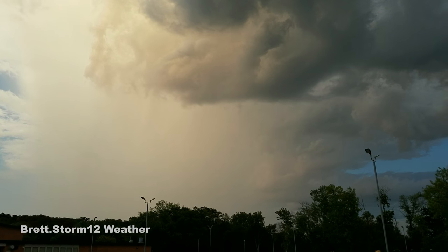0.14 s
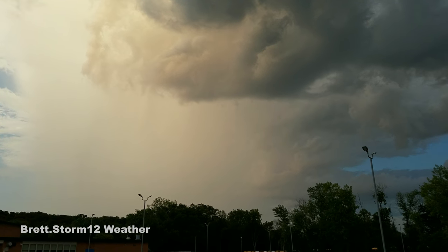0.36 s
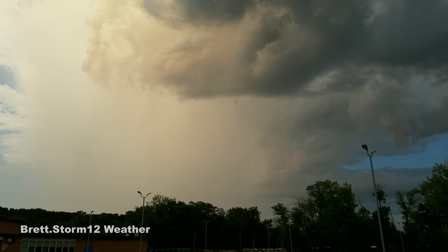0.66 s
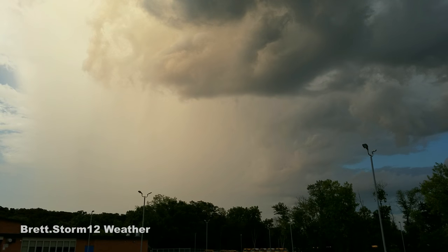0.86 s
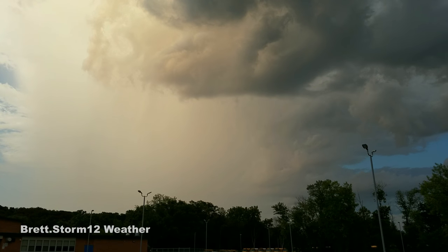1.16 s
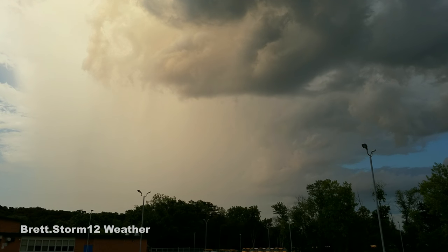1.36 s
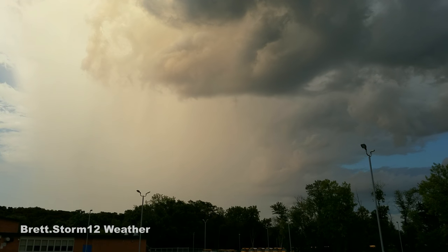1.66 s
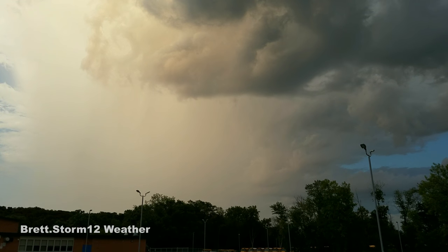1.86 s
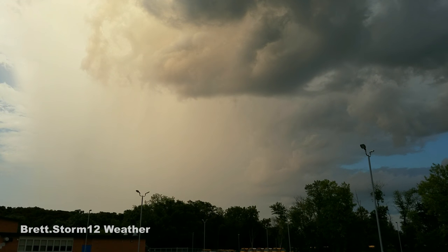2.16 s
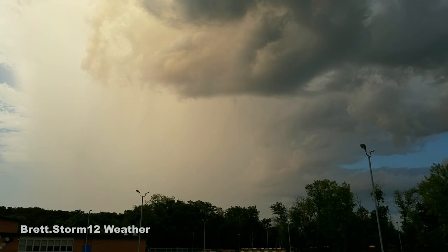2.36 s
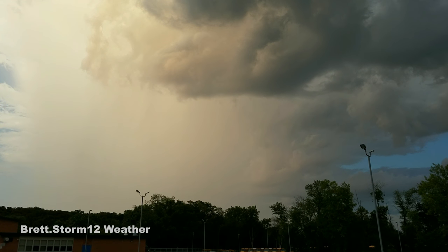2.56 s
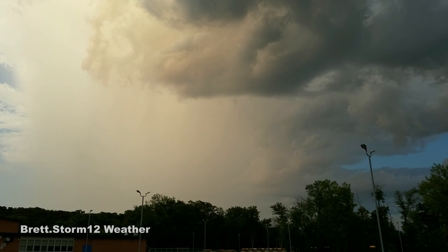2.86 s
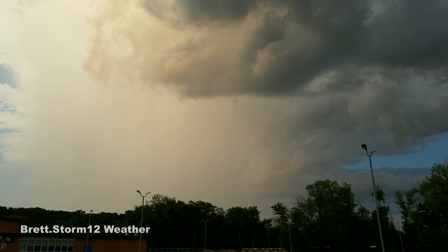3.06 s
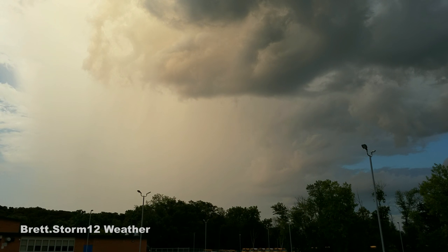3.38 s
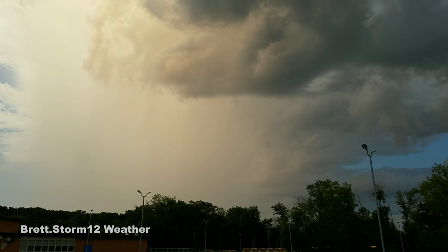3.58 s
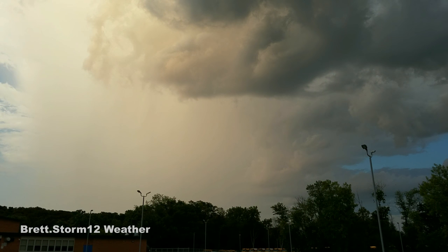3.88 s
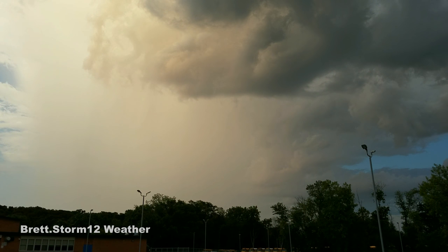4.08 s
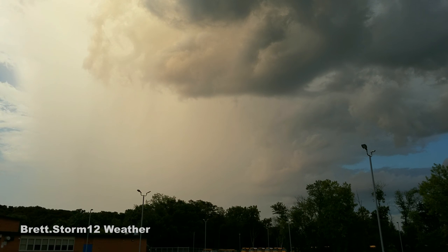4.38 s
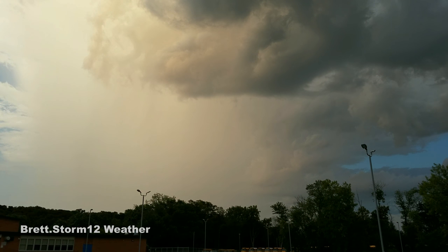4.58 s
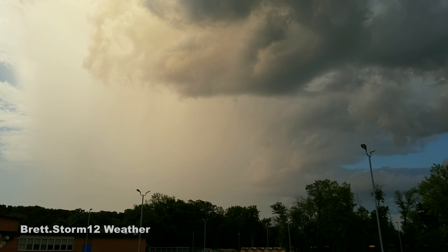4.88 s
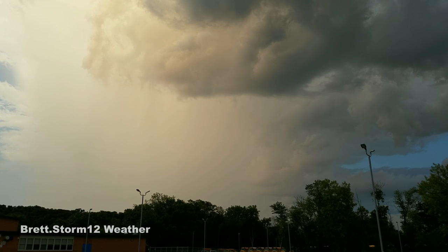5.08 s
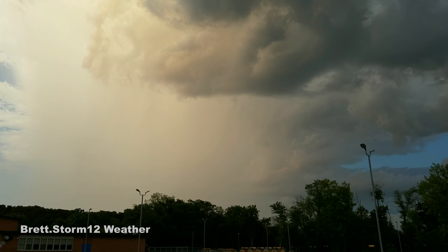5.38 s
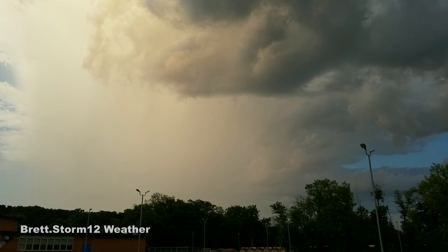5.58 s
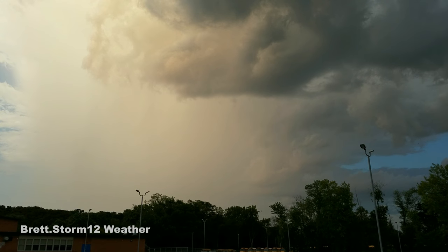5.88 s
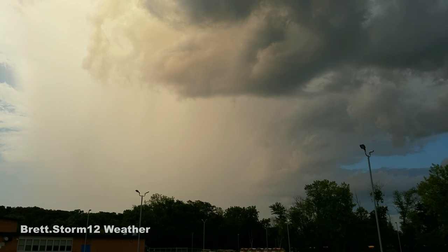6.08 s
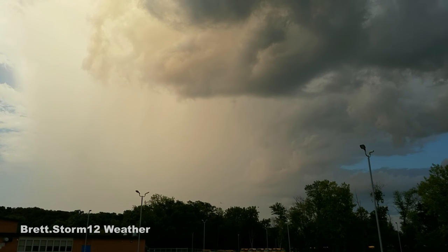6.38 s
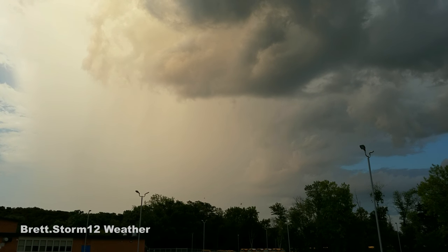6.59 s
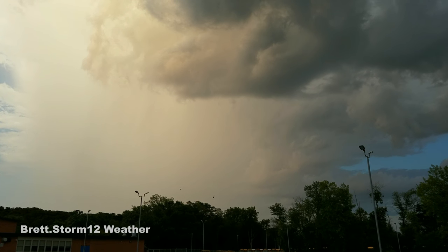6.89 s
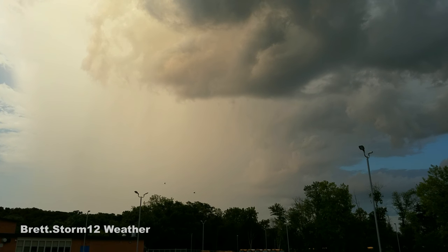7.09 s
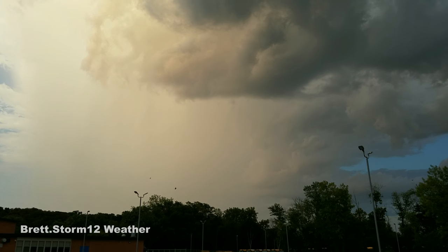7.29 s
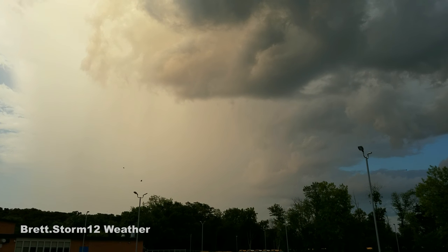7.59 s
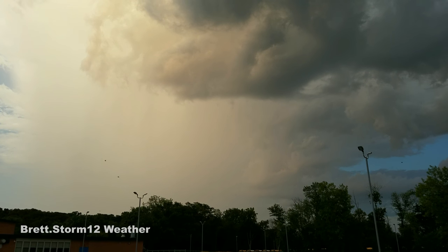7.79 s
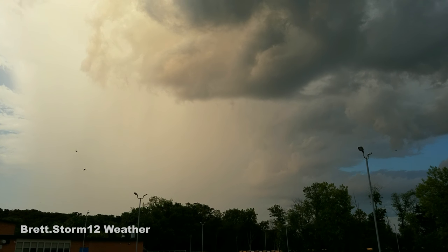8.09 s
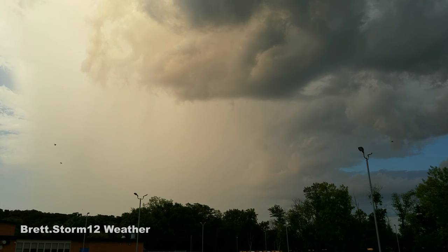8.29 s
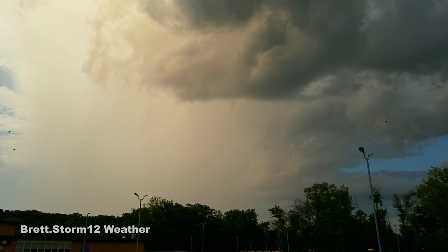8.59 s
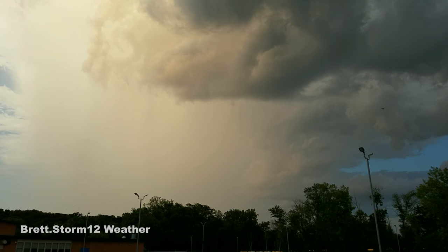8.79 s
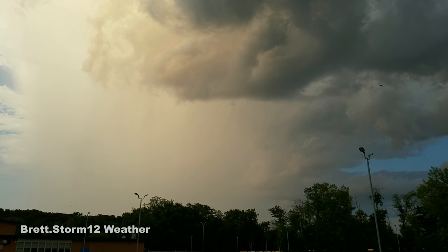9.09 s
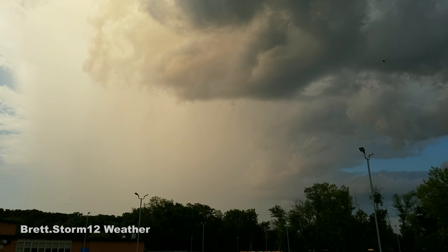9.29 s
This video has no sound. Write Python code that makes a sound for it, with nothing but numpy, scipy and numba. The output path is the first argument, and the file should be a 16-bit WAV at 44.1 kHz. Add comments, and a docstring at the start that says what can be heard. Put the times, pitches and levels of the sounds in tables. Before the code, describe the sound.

Outdoors under a storm cloud, a brief rough crackle leads into a violent thunder crack within the first half second. Clustered claps and tearing snaps follow for about two seconds, then heavy low booms roll unevenly, surging again past the middle and near the end. Faint bird chirps and slight hiss sit beneath. Stereo camera microphone, thunder a little louder on the right, loudest peaks rounded.

```python
"""Thunder over open ground

Every kink of the lightning channel sends a pressure pulse to a camera with two spaced microphones. The roll is
five swarms of random band-passed pulses, duller as the sound comes from further off. Booms and claps are
decaying sines, surges arched ones, cracks noise ticks with a rough pitched tearing. Around them: a deep noise
shudder, sine chirps of birds, a faint noise twitter and camera hiss; the loudest peaks are rounded."""
import sys
import numpy as np
from scipy import signal
from scipy.fft import rfft, irfft
from scipy.io import wavfile
from scipy.ndimage import uniform_filter1d
from numba import njit

SR = 44100
rng = np.random.default_rng(int(sys.argv[2]) if len(sys.argv) > 2 else 0)


def persist_wave(psi):
    """Save psi, clipped to +-1, as 16-bit WAV."""
    counts = np.round(np.clip(psi, -1, 1) * 32767).astype(np.int16)
    wavfile.write(sys.argv[1], SR, np.atleast_2d(counts).T)


def volts_from_decibels(level):
    """Turn decibel levels (scalar or array-like) into linear amplitude factors."""
    exponent = np.asarray(level, float) / 20
    return 10 ** exponent


N = 416744
T = np.arange(N) / SR
MAIN_S = 0.32  # cracks before and after this instant differ in shape

# Course of the roll. Each row: time in seconds, level of the long pulses in dB, of the middle pulses in dB.
ROLL_LEVELS = [(0.0, -46, -35), (0.26, -47, -24), (0.318, -40, -25), (0.35, -18, -17.5), (0.41, -34, -19.5),
               (0.45, -22.5, -18), (0.5, -33, -18), (0.54, -32, -22), (0.578, -38, -23.5),
               (0.625, -39, -24), (0.75, -31.5, -23.5), (0.92, -41, -30.5), (1.03, -34.5, -24.5),
               (1.08, -41, -23.5), (1.13, -39, -21.5), (1.241, -47, -30), (1.32, -30, -25),
               (1.6, -26.5, -26), (1.89, -26, -26.5), (2.26, -27.5, -29.5), (2.581, -28, -35.5),
               (2.64, -20, -25.5), (2.74, -21.5, -24.5), (2.81, -18.5, -27), (2.88, -23, -33.5),
               (3.42, -23.5, -30.5), (3.629, -21.5, -25), (4.33, -24, -28.5), (4.5, -24.5, -29.5),
               (5.3, -23.5, -30), (5.5, -24, -31.5), (5.735, -23.5, -29.5), (5.761, -16.5, -18),
               (5.95, -18.5, -22), (6.2, -24, -26.5), (6.7, -20, -24.5), (6.8, -24, -30),
               (7.55, -23.5, -26), (7.62, -24, -20), (7.7, -24, -29), (8.0, -24.5, -28.5), (8.55, -28, -36),
               (8.7, -24.5, -33), (9.08, -28, -35.5), (9.45, -27, -35)]
# Bursts of middle pulses. Each row: start in seconds, level in dB, pitch in Hz, level of the short pulses in dB.
CLAP_EVENTS = [(0.018, -19.5, 605, -33), (0.024, -19, 333, -18.5), (0.083, -18, 400, -20.5),
               (0.093, -21, 517, -16.5), (0.148, -16, 420, -36), (0.18, -20, 464, -36),
               (0.209, -14.5, 565, -30), (0.225, -21, 380, -37), (0.271, -12, 384, -23),
               (0.306, -18, 450, -18), (0.327, -6, 329, -10), (0.352, -2.5, 442, -47),
               (0.429, -5.5, 433, -26), (0.45, -4, 490, -17.5), (0.531, -7.5, 344, -19.5),
               (0.545, -1.5, 355, -28), (0.604, -7.5, 330, -22), (0.68, -14, 330, -27),
               (0.709, -12, 297, -24), (0.767, -8, 280, -23.5), (0.865, -16, 750, -27),
               (0.916, -12, 490, -23), (0.953, -14, 510, -21), (0.998, -10.5, 450, -25.5),
               (1.124, -8.5, 405, -51), (1.263, -14, 404, -30), (1.3, -6, 421, -22.5),
               (1.369, -10.5, 417, -52), (1.472, -14, 327, -23), (1.558, -8.5, 470, -23),
               (1.606, -16, 303, -37), (1.669, -9, 260, -21), (1.877, -13, 313, -26),
               (1.904, -6.5, 330, -22), (1.942, -9, 318, -28.5), (1.976, -6, 323, -26),
               (2.046, -16, 554, -27), (2.15, -26, 450, -30), (2.302, -13.5, 508, -18.5),
               (2.365, -13.5, 510, -35), (2.616, -10.5, 280, -37), (2.676, -12.5, 283, -26),
               (2.768, -12, 513, -26), (3.033, -19, 664, -32), (2.95, -21.5, 500, -32),
               (3.17, -24, 495, -29.5), (3.2, -21, 506, -28.5), (1.853, -24, 496, -34.5),
               (3.435, -19, 514, -30.5), (3.486, -12, 456, -28.5), (3.721, -8.5, 333, -35),
               (3.802, -16, 478, -25), (3.829, -14, 287, -48), (4.028, -27, 500, -34.5),
               (4.073, -11, 496, -34), (4.091, -20, 306, -26.5), (4.279, -15, 485, -25.5),
               (4.323, -15, 683, -26), (5.335, -16.5, 500, -32), (5.455, -20, 300, -49),
               (5.751, -10.5, 592, -48), (5.764, -9.5, 614, -45), (5.778, -9, 500, -42),
               (5.802, -4, 370, -40), (5.814, -16, 745, -40), (5.85, -15.5, 444, -44),
               (5.903, -9.5, 425, -39), (6.07, -14, 478, -40), (6.315, -9.5, 391, -48),
               (7.169, -12.5, 383, -45), (7.219, -13.5, 326, -60), (7.595, -9, 312, -45),
               (7.622, -13, 350, -48), (7.718, -16, 397, -33.5), (7.953, -16.5, 353, -45)]
# Steep shock fronts. Each row: start in seconds, relative tick level in dB, relative tearing level in dB,
# tearing pitch in Hz.
CRACK_EVENTS = [(0.027, -61, -39, 2050), (0.092, -66, -30, 2600), (0.201, -60.5, -25.5, 2990),
                (0.209, -65.5, -32, 2170), (0.219, -55, -34, 2840), (0.228, -62.5, -23.5, 2150),
                (0.27, -60, -22, 2450), (0.278, -62, -27.5, 3200), (0.288, -54.5, -24.5, 3000),
                (0.294, -65.5, -29, 2030), (0.327, -30, -19, 3300), (0.3413, -31, -8, 2150),
                (0.355, -41, -38, 2100), (0.369, -47, -40, 2280), (0.3894, -48.5, -17, 1900),
                (0.4236, -45, -25, 1950), (0.449, -35.5, -19, 1830), (0.5124, -47, -23, 2360),
                (0.527, -34.5, -18.5, 4540), (0.5485, -30, -16, 1895), (0.604, -29, -18, 1860),
                (0.633, -42, -20, 1720), (0.6606, -47, -33, 1930), (0.68, -44, -20, 1990),
                (0.7107, -47.5, -26, 1970), (0.767, -39, -25, 1930), (0.918, -44, -36, 1970),
                (0.955, -40.5, -46, 1880), (0.9992, -42, -18, 1930), (1.0657, -54, -17.5, 1840),
                (1.118, -46.5, -48, 1880), (1.3, -38, -22, 1980), (1.3299, -45.5, -17, 1900),
                (1.3447, -46.5, -25, 1790), (1.3833, -54, -47, 1770), (1.4371, -47, -19, 1970),
                (1.4504, -43, -18, 1900), (1.474, -44.5, -23, 1910), (1.513, -50, -20, 1810),
                (1.5575, -43.5, -21, 2180), (1.669, -46, -26, 2080), (1.698, -52, -31, 2380),
                (1.8788, -63, -45, 1750), (1.943, -57, -37, 2300), (1.975, -56.5, -21.5, 2400),
                (2.3032, -61.5, -36, 2180), (2.6428, -69.5, -22.5, 1720), (2.673, -62.5, -25.5, 1820),
                (2.7834, -65, -23.5, 1820), (3.033, -73, -25, 1850)]
# Pulse runs without a sharp front. Each row: start in seconds, peak in dB, pitch in Hz,
# level of the short pulses in dB, length in seconds.
SURGE_EVENTS = [(.408, -15, 700, -34, 0.02), (0.461, -8.5, 450, -43, 0.022), (0.513, -8.5, 403, -29, 0.025),
                (0.588, -10.5, 405, -38, .016), (0.613, -9.5, 630, -20.5, 0.032),
                (.643, -14, 440, -32, 0.015), (0.66, -15, 398, -27, 0.019), (1.03, -12.5, 487, -38, 0.076),
                (1.174, -23.5, 600, -24, 0.025), (1.322, -11.5, 410, -25.5, 0.034),
                (2.474, -17.5, 305, -33, 0.055), (3.501, -17.5, 497, -40.5, 0.027),
                (3.553, -27, 451.5, -29.5, .11), (5.519, -20, 489, -43, .045)]


@njit
def svf(x, hz, damp, low):
    """State-variable filter with a moving centre: low-pass, or band-pass of gain 1."""
    y, band_state, low_state = np.empty(len(x)), 0., 0.
    for i in range(len(x)):
        g = np.tan(np.pi * hz[i] / SR)
        v = (band_state + g * (x[i] - low_state)) / (1 + g * (g + damp))
        lo = low_state + g * v
        band_state, low_state = 2 * v - band_state, 2 * lo - low_state
        y[i] = lo if low else damp * v
    return y


def band(x, hz, width_hz):
    """Fixed band-pass on both channels."""
    centre_hz = np.full(N, 1. * hz)
    return np.array([svf(c + 1e-18, centre_hz, width_hz / hz, False) for c in x])


def unit(x):
    """Scale to rms 1."""
    return x / np.sqrt(np.mean(x ** 2))


def walk(rate_hz):
    """Random levels held 1 / rate_hz and slewed twice; spread near 1."""
    k = int(SR / rate_hz)
    steps = np.repeat(rng.standard_normal(N // k + 1), k)
    return 1.36 * uniform_filter1d(uniform_filter1d(steps, k), k)[:N]


def add(out, s, wave):
    """Mix a short sound in at time s."""
    i = max(int(s * SR), 0)
    out[..., i:i + wave.shape[-1]] += wave[..., :N - i]


def swell(t, rise_s, t60_s):
    """Quick rise, exponential fall, peak 1."""
    e = (1 - np.exp(-t / rise_s)) ** 2 * np.exp(-np.log(1000) * t / t60_s)
    return e / e.max()


def arch(length_s):
    """Half-sine rise and fall."""
    return np.sin(np.pi * T[:int(length_s * SR)] / length_s)


def late(s):
    """Left-microphone lag in seconds; the sounding part of the channel moves across the sky."""
    # Each row: time in seconds, lag of the left microphone in ms.
    bearing = [(0, 0.4), (.4, 0.22), (1.4, 0.2), (3.6, -0.081), (5.5, -0.16), (5.75, 0.094), (7.8, 0.085),
               (8.7, -.14), (9.45, -0.15)]
    return np.interp(s, *np.transpose(bearing)) / 1000


def mic_times(t, s):
    """Clock of an arrival at the left and right microphones, the lag shared between them."""
    return t - late(s) * np.array([[.5], [-.5]])


def hiss():
    """Camera noise, unrelated in the two channels; it sinks just after the first strong cracks, slowly creeps back."""
    # Each row: frequency in Hz, relative spectral level in dB.
    spectrum = [(1700, -23.5), (2600, 10), (3300, 3.5), (3600, 1.5), (3950, 2.5), (4500, 0), (7590, -15.5),
                (11100, -12), (14400, -6), (15200, -3), (16000, -13.5)]
    hz, db = np.transpose(spectrum)
    f_hz = np.arange(N // 2 + 1) * SR / N + 1
    shape = volts_from_decibels(np.interp(np.log(f_hz), np.log(hz), db))
    noise = irfft(rfft(rng.standard_normal((2, N))) * shape, N)
    level_db, sink_db = -63, -10.5
    sunk = np.interp(T, (.55, 1.05, 1.6, 4.7), (0, 1, 1, 0))
    return unit(noise) * volts_from_decibels(level_db + sink_db * sunk)


def deep():
    """A wavering noise shudder at the bottom of hearing, partly wind on each microphone."""
    # Each row: time in seconds, level in dB.
    course = [(0, -49.5), (1.2, -52), (1.8, -48), (2.3, -50.5), (3.7, -44), (5.0, -45), (5.8, -41.5),
              (7.5, -45), (9.45, -43.5)]
    x = rng.standard_normal(N) + 0.31 * rng.standard_normal((2, N))
    level_db = np.interp(T, *np.transpose(course)) + 1.9 * walk(11)
    return volts_from_decibels(level_db) * unit(band(band(x, 56, 40), 44, 60))


def twitter():
    """A narrow flickering band of high noise, thin and far off, perhaps birds."""
    centre_hz, width_hz = 3950, 600
    x = band(rng.standard_normal((2, N)), centre_hz, width_hz)
    x = band(x, centre_hz, width_hz)
    level_db = np.interp(T, (0, 4.5, 9.45), (-94.5, -84, -79)) + 3.2 * walk(14)
    return unit(x) * volts_from_decibels(level_db)


def bird():
    """Two thin tones fall together in each chirp; another bird gives one level note; both on the right."""
    # Each row: start in seconds, upper starting pitch in Hz, lower one in Hz, peak of each tone at right in dB.
    chirp_rows = [(5.715, 10700, 8600, -77), (5.875, 10700, 8500, -74), (6.054, 11200, 9100, -69),
                  (6.43, 11300, 9200, -65)]
    out, t = np.zeros(N), T[:int(.035 * SR)]
    turns_per_hz = t - 1.1 * t ** 2
    for s, upper_hz, lower_hz, db in chirp_rows:
        tones = sum(np.sin(2 * np.pi * hz * turns_per_hz) for hz in (upper_hz, lower_hz))
        add(out, s, volts_from_decibels(db) * np.hanning(len(t)) * tones)
    note_s, note_hz, note_db = 8.54, 4270, -61
    t = T[:SR // 18]
    add(out, note_s, volts_from_decibels(note_db) * np.hanning(len(t)) * np.sin(2 * np.pi * note_hz * t))
    return out * np.array([[.3], [1]])


def spikes(s, size, lag_s):
    """Impulses at fractional samples, reaching one microphone a little before the other."""
    out = np.zeros((2, N))
    for c, sign in enumerate((.5, -.5)):
        at = np.clip((s + sign * lag_s) * SR, 0, N - 2)
        i = at.astype(int)
        out[c] = np.bincount(i, size * (1 - at + i), N) + np.bincount(i + 1, size * (at - i), N)
    return out


def swarm(hz, width_hz, per_s, scatter_db, patchy_db):
    """Dense random arrivals of one pulse size; longer and shorter pulses take turns, so the colour is patchy."""
    chance = rng.random((int(per_s * N / SR), 4)).T
    s = chance[0] * N / SR
    size = np.sign(chance[1] - .5) * volts_from_decibels(-scatter_db * np.log(1 - chance[2]))
    lag_spread_s = .00008  # rms, over arrival directions
    lag_s = late(s) + np.sqrt(12) * lag_spread_s * (chance[3] - .5)
    x = band(spikes(s, size, lag_s), hz, width_hz)
    x = band(x, hz, 1.9 * width_hz)
    patches = 0
    for r in (.55, .75, 1.01, 1.3, 1.7):
        patches = patches + volts_from_decibels(patchy_db * walk(30)) * band(x, hz * r, .3 * width_hz * r) / np.sqrt(r)
    return unit(patches)


def roll():
    """Five swarms follow the roll, lurch together, and flare at claps, surges and cracks."""
    # Each row: centre in Hz, width in Hz, arrivals per second, size scatter in dB, patchiness in dB.
    pulse_sizes = [(156.3, 107, 900, 1.0, 2.0), (373.3, 472, 2500, 0.87, 3.5), (695, 514, 4000, 1.5, 5.5),
                   (1214, 1370, 5500, 1.5, 4), (2700, 6500, 3300, 1.5, 3.5)]
    # Each row: time in seconds, then upper-middle, short and finest swarm re the middle one in dB.
    finer_levels = [(0, -6, -12, -11), (.12, -5, 1.5, -11), (.28, -16, -4.5, -18), (.36, 2.5, -5.5, -15.5),
                    (.65, -7.5, -7.5, -14.5), (.9, 2.5, -4, -16.5), (1.15, -7, -6.5, -17.5),
                    (1.5, -1.5, -4, -15), (1.85, -12, -3.5, -19), (2.1, -5.5, -2, -21),
                    (2.55, 2, 0.5, -14.5), (2.65, -20, -7, -18.5), (2.9, -2.5, -4.5, -13.5),
                    (3.2, -2, -4.5, -15.5), (3.4, -8, -6, -20.5), (3.65, -8.5, -5.5, -18.5),
                    (4.25, -0.5, -3.5, -22), (4.5, -6, -6.5, -23), (5.3, -10.5, -6.5, -20.5),
                    (5.4, -1, -2, -23), (5.7, -2.5, -11, -28), (5.76, -13.5, -17, -27),
                    (6.2, -6, -11, -24.5), (6.8, -6, -10.5, -27.5), (7.3, -12.5, -14, -25),
                    (7.6, -7.5, -13.5, -33), (8.0, -6.5, -9, -23), (8.3, -10, -13.5, -22.5),
                    (8.65, 0.5, -7, -34), (9.0, -14.5, -10, -26), (9.45, -4, -10.5, -27)]
    s, *levels = np.transpose(ROLL_LEVELS)
    long_db, middle_db = (np.interp(T, s, db) for db in levels)
    s, *finer = np.transpose(finer_levels)
    finer_db = [middle_db + np.interp(T, s, db) for db in finer]
    gains = volts_from_decibels(np.array([long_db, middle_db, *finer_db]))
    for s0, db, _, short_db in CLAP_EVENTS:
        rise_s = 0.00008 + 0.000086 * s0  # a longer path smears the front
        flare = swell(T[:SR // 4], rise_s, 0.067 * (1 + 0.027 * s0))
        add(gains[1:4], s0, flare * volts_from_decibels([[db - 14.0], [db - 15.5], [short_db]]))
    for s0, db, _, short_db, length_s in SURGE_EVENTS:
        add(gains[1:4], s0, arch(length_s) * volts_from_decibels([[db - 12.0], [db - 13.5], [short_db]]))
    for s0, _, tear_db, _ in CRACK_EVENTS:
        rise_s, offset_db = (.0005, -8.5) if s0 > MAIN_S else (.003, -4.0)
        add(gains[4], s0, swell(T[:SR // 4], rise_s, 0.02) * volts_from_decibels(tear_db + offset_db))
    lurch = volts_from_decibels(0.62 * walk(30) + 0.42 * walk(9))
    return sum(g * lurch * swarm(*size) for g, size in zip(gains, pulse_sizes))


def thumps(table, rise_turns, smear_per_s, t60_s):
    """A strong pulse and its echoes make a few swings at one pitch; later ones, from further off, start softer."""
    out, t = np.zeros((2, N)), T[:SR // 4]
    for s, db, hz, *_ in table:
        shape = swell(t, rise_turns * (1 + smear_per_s * s) / hz, t60_s)
        add(out, s, volts_from_decibels(db) * shape * np.sin(2 * np.pi * hz * mic_times(t, s)))
    return out


def faint():
    """Rows of fainter thumps at random times, strengths (re the long pulses) and pitches."""
    per_s, offset_db, scatter_db, centre_hz, spread_octaves = 6, -3, 1.5, 175, .3
    rows = int(per_s * N / SR)
    s, chance = rng.random(rows) * N / SR, rng.standard_normal((rows, 2)).T
    db = np.interp(s, *np.transpose(ROLL_LEVELS)[:2]) + offset_db + scatter_db * chance[0]
    return np.transpose([s, db, centre_hz * 2 ** (spread_octaves * chance[1])])


def booms():
    """Low thumps of two or three swings, strong ones from the table and faint ones at random."""
    # Each row: start in seconds, level in dB, pitch in Hz.
    boom_rows = [(0.329, -8, 174), (0.45, -12, 92.6), (0.597, -12, 275), (1.117, -12.5, 191),
                 (1.295, -13.5, 239), (1.465, -10, 178), (1.51, -12.5, 183), (1.558, -10.5, 188),
                 (1.677, -10, 159), (1.774, -9.5, 162), (1.888, -9, 197), (1.908, -6.5, 160),
                 (1.975, -6.5, 155), (2.0, -10.5, 170), (2.163, -13, 173), (2.51, -17, 206),
                 (2.648, -4, 141), (2.672, -1.5, 165), (2.782, -3, 175), (2.805, -14.5, 170),
                 (2.835, -11.5, 168), (3.035, -9.5, 133), (3.487, -12.5, 186), (3.581, -9, 170),
                 (3.658, -7, 167), (3.72, -3.5, 166), (3.748, -7, 167), (3.828, -8.5, 171),
                 (3.898, -10, 153), (4.102, -13.5, 170), (4.36, -5, 159.5), (5.08, -5.5, 144),
                 (5.453, -17, 149), (5.76, -8, 179), (5.775, -10, 80), (5.823, -7, 144),
                 (5.871, -11.5, 183), (5.916, -15.5, 184), (5.979, -10.5, 168), (6.427, -5.5, 164),
                 (6.452, -10, 105), (6.555, -8, 145), (6.671, -0.5, 170.6), (6.727, -10.5, 168),
                 (6.807, -6, 166), (7.053, -7.5, 177), (7.235, -10, 167), (7.275, -7.5, 167),
                 (7.449, -12, 121), (7.945, -10.5, 150), (7.968, -12.5, 174), (8.679, -17.5, 160),
                 (8.77, -14.5, 163), (8.92, -17.5, 159), (9.145, -5.5, 160), (9.17, -15.5, 160),
                 (9.29, -14, 165)]
    return thumps([*boom_rows, *faint()], rise_turns=0.4, smear_per_s=0.011, t60_s=0.073)


def claps():
    """Bursts of middle pulses: steep-fronted thumps at a higher pitch."""
    return thumps(CLAP_EVENTS, rise_turns=0.033, smear_per_s=0.2, t60_s=0.058)


def surges():
    """Runs of like-sized pulses give a wavering pitch that builds up and dies away."""
    out = np.zeros((2, N))
    for s, db, hz, _, length_s in SURGE_EVENTS:
        shape, drift = arch(length_s), rng.standard_normal(SR // 8)
        waver = 13.1 * np.cumsum(uniform_filter1d(drift, size=130))[:len(shape)] * hz / SR
        turns = hz * mic_times(T[:len(shape)], s)
        add(out, s, volts_from_decibels(db) * shape * np.sin(2 * np.pi * turns + waver))
    return out


def tearing():
    """Behind each crack a run of like-sized pulses tears at one rough pitch, rasping longer before MAIN_S."""
    out, t = np.zeros((2, N)), T[:SR // 8]
    for s, _, tear_db, hz in CRACK_EVENTS:
        rise_s, t60_s, extra_db = (0.0015, 0.069, 20.4) if s < MAIN_S else (0.00068, 0.048, 12)
        wobble = uniform_filter1d(rng.standard_normal((2, len(t))), size=70)
        phase = 2 * np.pi * hz * mic_times(t, s)
        wave = wobble[0] * np.sin(phase) + wobble[1] * np.cos(phase)
        add(out, s, volts_from_decibels(tear_db + extra_db) * swell(t, rise_s, t60_s) * wave)
    return out


def cracks():
    """A steep front is a sharp tick, then faint splintering; its top is more scattered and weaker in later ones."""
    tick, top, t = np.zeros((2, N)), np.zeros((2, N)), T[:SR // 10]
    for s, db, *_ in CRACK_EVENTS:
        shared, own = rng.standard_normal(len(t)), rng.standard_normal((2, len(t)))
        shape = volts_from_decibels(db + 11.0) * (swell(t, .0001, 0.0059) + 0.2 * swell(t, 0.0011, 0.066))
        add(tick, s, shape * (shared + .6 * own))
        add(top, s, shape * (.45 * shared + own))
    tick = band(band(tick, 4400, 2400), 4100, 7600)
    top = volts_from_decibels(-6.5 - 10.5 * T) * band(band(top, 15000, 9000), 14000, 12000)
    return (tick + top) * volts_from_decibels([[-1.5], [1.5]])


def colour(x):
    """A hard surface close by returns everything a moment later; one lift and one dip shape the low mids."""
    bounce_s, bounce_db = 0.000759, -17
    x = x + volts_from_decibels(bounce_db) * np.array([np.interp(T - bounce_s, T, c) for c in x])
    return x + .45 * band(x, 305, 70) - 0.44 * band(x, 235, 60)


def air(x):
    """Absorption grows with distance and frequency squared, so the treble edge falls as the source recedes."""
    nearest_m, nearest_edge_hz = 446, 6160
    edge_hz = nearest_edge_hz * np.sqrt(nearest_m / (nearest_m + 343 * T))
    for damp in (1.9, 1.3, .8):
        x = np.array([svf(c, edge_hz, damp, True) for c in x])
    return x


def scene():
    """Thunder through the air, a little louder on the right, over shudder, birds and twitter."""
    pulses = booms() + claps()
    thunder = air(colour(roll()) + pulses + surges() + tearing()) + cracks()
    left_re_right_db = -1.94
    balance = volts_from_decibels(np.array([[left_re_right_db], [-left_re_right_db]]) / 2)
    return thunder * balance + deep() + bird() + twitter()


def top_cut(x):
    """Nothing passes above the cut-off."""
    return signal.sosfilt(signal.butter(12, 15830, fs=SR, output="sos"), x)


def record(dry):
    """The microphones shed the deepest bass; the input stage rounds peaks towards full scale and adds hiss."""
    dry = signal.lfilter(*signal.butter(1, 45, "high", fs=SR), dry)
    knee = 9.0  # higher = harder
    rounded = dry / (1 + np.abs(dry) ** knee) ** (1 / knee)
    return top_cut(rounded + hiss())


dry = scene()
out = record(dry)
persist_wave(out)
```